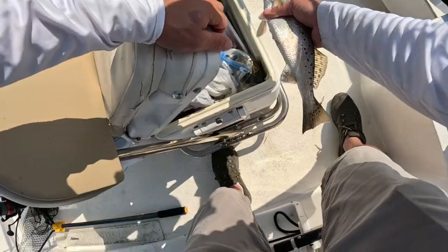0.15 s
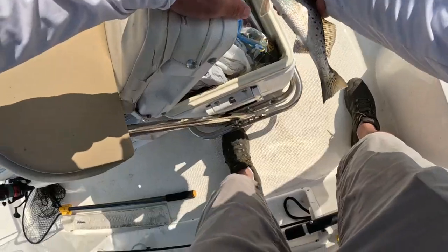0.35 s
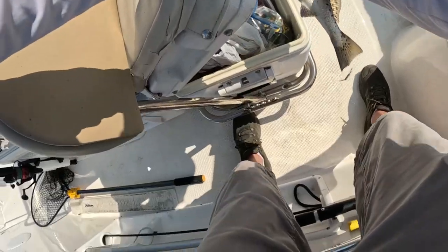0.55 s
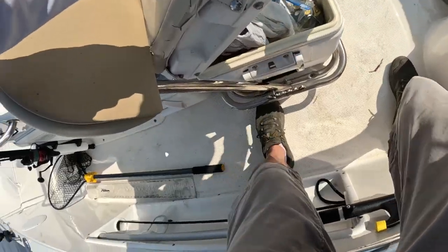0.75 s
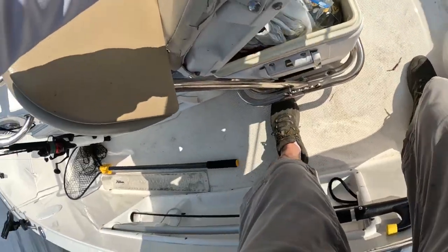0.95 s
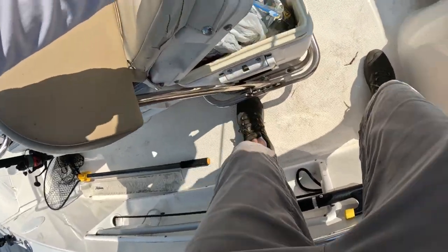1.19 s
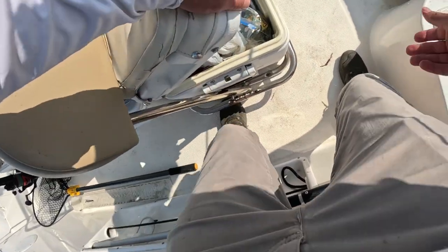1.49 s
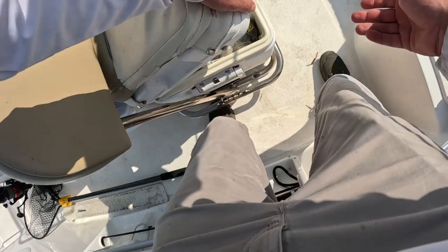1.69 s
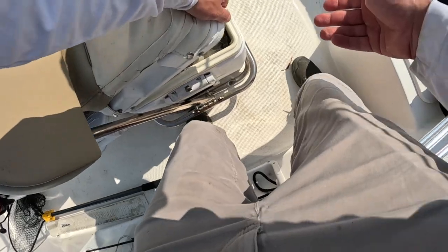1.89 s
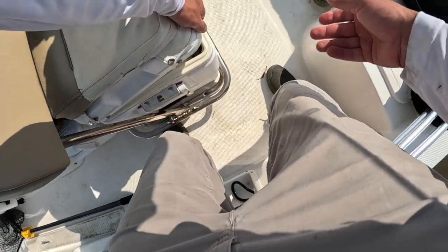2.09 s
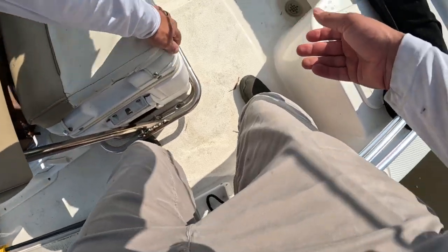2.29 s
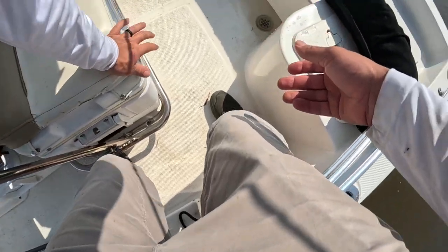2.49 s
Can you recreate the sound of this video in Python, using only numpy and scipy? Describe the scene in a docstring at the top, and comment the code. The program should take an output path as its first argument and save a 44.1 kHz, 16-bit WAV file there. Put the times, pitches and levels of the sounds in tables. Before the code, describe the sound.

Fish flopping in a plastic box, close up: rapid hollow thumps, wet slaps, knocks and rustling

```python
"""A freshly caught fish thrashes in a plastic cooler on a small boat's deck, close to the microphone. Its body
thumps the hollow box: swelling sine pushes, each with a boom of low noise; sines ring and knock. Its wet tail
slaps: short noise cracks with a ping; one faint bright click is made the same way, over a low thud made like a
body blow. Ice and plastic bags crunch and rustle under it: clumped grains and pitched ticks. Low-passed noise
is its body rubbing along the box."""
import sys
import numpy as np
from scipy import signal
from scipy.fft import rfft, irfft
from scipy.io import wavfile
from scipy.ndimage import uniform_filter1d

SR = 44100
rng = np.random.default_rng(int(sys.argv[2]) if len(sys.argv) > 2 else 0)


def pcm_store(signal):
    """Save signal as 16-bit PCM."""
    levels = np.round(np.clip(np.atleast_2d(signal), -1, 1) * 32767)
    wavfile.write(sys.argv[1], SR, levels.astype(np.int16).T)


N = 116865  # samples

# Rubbing of the body along the box. Each row: time in seconds, level in dB.
DRAG_LEVEL = [(0, -41.5), (.15, -34), (0.442, -45), (.78, -43), (.85, -59), (1.02, -51.5), (1.069, -30),
              (1.48, -38.5), (1.93, -32.5), (2.292, -40), (2.41, -30), (2.56, -49)]
# Spectrum of the rubbing. Each row: frequency in Hz, relative gain in dB.
DRAG_SPECTRUM = [(50, -30.5), (100, 2), (330, 6), (450, 1.5), (650, -16.5), (10000, -100)]

# Rustle of ice and bags. Each row: time in seconds, level in dB.
RUSTLE_LEVEL = [(0, -43), (.23, -37.5), (.27, -44.5), (.32, -37), (.39, -41.5), (.42, -56.5), (.50, -34.5),
                (.66, -37), (.71, -50.5), (1.069, -55), (1.078, -34.5), (1.135, -23), (1.20, -40.5),
                (1.28, -30.5), (1.33, -46.5), (1.55, -40), (1.73, -38), (1.86, -47), (1.93, -36.5),
                (2.00, -34.5), (2.10, -47.5), (2.30, -47), (2.39, -34), (2.46, -48), (2.65, -51)]
# Spectrum of the rustle grains. Each row: frequency in Hz, relative gain in dB.
RUSTLE_SPECTRUM = [(200, 9.5), (500, 13.5), (1000, 5.5), (2000, 5.5), (4000, 4.5), (7400, -5.5),
                   (8600, -18.5), (11500, -19), (15500, -42)]
GRAINS_PER_S, GRAIN_SPREAD_DB = 5000, 2.5
CLUMP_DB, CLUMP_S = 5, 0.0065  # limit of the level swing either way, time between its random points
TICKS_PER_S, TICK_DB, TICK_DECAY_CYCLES = 170, 2.5, 8.2
TICK_LOW_HZ, TICK_HIGH_HZ = 1086, 4500

# Hard knocks on a small patch of plastic or ice. Each row: start in seconds, relative level in dB, pitch in Hz.
KNOCKS = [(0.338, -14, 1824), (.338, -26, 642), (.575, -26.5, 1110), (.589, -25, 1600),
          (0.614, -26.5, 1294), (0.635, -8.5, 3310), (0.639, -17, 2020), (0.683, -25, 1430),
          (1.159, -17, 1040), (1.307, -25, 755), (2.034, -20, 2510), (2.376, -17.5, 615)]
KNOCK_RISE_CYCLES, KNOCK_T60_CYCLES = 2.1, 33.5  # higher knocks die sooner

# Blows that leave the box wall ringing. Each row: start in seconds, relative level in dB, pitch in Hz.
WALL_RINGS = [(.211, -22, 513), (0.696, -15.5, 397), (.901, -33.5, 496), (1.172, -15.5, 406),
              (1.35, -11, 173), (1.67, -13.5, 319.4), (2.108, -15.5, 329)]
WALL_RISE_S, WALL_T60_S = 0.004, 0.11

# Wet slaps and, at 0.155 s, a faint bright click. Each row: onset in seconds, relative level in dB,
# ring pitch in Hz, decay in seconds.
SLAPS_AND_CLICK = [(.006, -31, 1412, 0.032), (0.155, -40, 8330, 0.0023), (.209, -22.5, 1055, 0.0053),
                   (.300, -30.5, 5350, 0.0053), (0.333, -22, 7040, 0.0041), (0.338, -18.5, 2540, 0.0025),
                   (.357, -29.5, 2090, 0.012), (0.5745, -23.5, 3440, 0.0045), (0.6355, -21.5, 2390, 0.0062),
                   (.685, -28, 1860, 0.0044), (0.899, -36, 1650, 0.0064), (.954, -35, 3270, 0.0022),
                   (1.088, -22, 710, 0.0079), (1.116, -20, 2460, 0.0047), (1.131, -27, 4200, 0.0022),
                   (1.158, -16.5, 1830, 0.0035), (1.21, -24, 2680, 0.009), (1.267, -17, 1065, 0.0059),
                   (1.346, -22.5, 3666, .012), (1.412, -22.5, 2160, 0.0046), (1.429, -10.5, 3547, 0.0064),
                   (1.508, -26.5, 1383, 0.014), (1.523, -18, 2237, 0.0094), (1.558, -27.5, 2170, 0.0055),
                   (1.600, -27, 1285, 0.0057), (1.661, -25.5, 2040, 0.0024), (1.705, -24, 3140, 0.01),
                   (1.736, -15, 2244, 0.0063), (1.806, -14.5, 2886, 0.0091), (1.886, -16, 3270, 0.0081),
                   (1.900, -20.5, 2067, 0.0092), (2.031, -26, 2070, 0.0084), (2.066, -30, 2560, 0.015),
                   (2.085, -29.5, 5270, 0.0055), (2.154, -34, 2460, 0.011), (2.189, -27.5, 2870, 0.0059),
                   (2.205, -32.5, 1760, 0.0075), (2.252, -32, 1825, 0.012), (2.321, -32.5, 2090, 0.0077),
                   (2.376, -33, 1530, 0.0051), (2.478, -20, 2590, 0.0082), (2.598, -39.5, 930, 0.022)]
# Slap spectrum before tilt and resonance. Each row: frequency in Hz, relative gain in dB.
SLAP_SPECTRUM = [(250, -9.5), (600, 4.5), (1000, -1), (2300, 0.5), (5500, -4.5), (7400, -12.5),
                 (8600, -23.5), (13000, -31), (15500, -64)]
SLAP_RISE_S = 0.001
SPRAY_DB, SPRAY_DECAY_S = -35.5, 0.012  # wet scatter after the smack
TOUCH_DB, TOUCH_S = -11.5, 0.0025  # wet skin touches ahead of the smack
RAGGED_DB, RAGGED_S = 1, 0.00255  # uneven contact
TILT_DB_PER_OCT2 = 5  # dB per octave, for each octave of ring pitch above 2500 Hz
POCKET_NOISE_DB, POCKET_WIDTH_OCT, POCKET_PING_DB = 5.5, 0.2, -11  # trapped air

# Body blows on the box, and at 0.156 s a low thud under the faint bright click. Each row: start in seconds,
# relative level in dB, pitch in Hz at the crest, # time to the crest in seconds.
THUMPS = [(0.156, -22, 365, 0.0057), (0.210, -15.5, 316, 0.0069), (0.256, -24.5, 300, 0.0036),
          (0.339, -6, 399, 0.0049), (0.359, -7.5, 345, 0.0048), (0.522, -16.5, 330, 0.0048),
          (0.537, -11.5, 327, 0.0033), (0.576, -8.5, 384, 0.0099), (0.591, -8, 284, 0.0097),
          (0.609, -11, 348, 0.009), (0.638, -5.5, 237, 0.005), (0.686, -17.5, 254, 0.0074),
          (.901, -22.5, 281, 0.0054), (1.089, -17, 416, 0.0075), (1.113, -7, 254, 0.0023),
          (1.16, -5, 278, 0.0051), (1.267, -6, 340, 0.0079), (1.282, -10.5, 366, 0.009),
          (1.297, -14, 289, 0.0045), (1.314, -14, 370, 0.0059), (1.346, -6, 247, 0.0035),
          (1.413, -8, 280, 0.0038), (1.431, -8, 294, 0.0042), (1.528, -12, 289, 0.0046),
          (1.558, -14, 256, 0.0035), (1.602, -16, 290, 0.0048), (1.662, -7, 325, 0.0069),
          (1.742, -3.5, 282, 0.0049), (1.758, -15, 363, 0.0032), (1.811, -7.5, 384, 0.002),
          (1.824, -14, 315, 0.0069), (1.886, -17, 378, 0.004), (1.903, -12, 217, 0.003),
          (2.03, -10.5, 397.3, 0.011), (2.087, -9, 339, 0.0096), (2.154, -17, 400, 0.0021),
          (2.192, -10, 340, 0.0028), (2.208, -17.5, 341, 0.015), (2.323, -17.5, 342, 0.0061),
          (2.378, -12, 395, 0.003), (2.538, -30, 385, 0.0075)]
SWELL_POWER, SAG = 3.6, 0.099  # steepness of the blow, share by which pitch sinks per swell time
# Boom spectrum of the box for a 320 Hz blow. Each row: frequency in Hz, relative gain in dB.
BOX_SPECTRUM = [(60, -39.5), (110, -13), (165, 0), (300, 2), (420, 6.5), (520, -12.5), (680, -14),
                (10000, -110)]
BOX_DB, BOX_T60_S, BOX_RISE_S = -5, 0.11, 0.0031
BOOM_FOLLOW = 0.27  # exponent by which the boom follows the blow's pitch

SHADE_FROM_S, SHADE_DB_PER_S, SHADE_HZ = 1.56, -11, 5800
LOW_CUT_HZ, TOP_CUT_HZ, EDGE_HZ = 116, 13200, 15700
CEILING = 0.77  # full scale = 1


def amp(db):
    """Converts dB to an amplitude factor."""
    return 10 ** (np.asarray(db) / 20)


def unit(x):
    """Scales to rms 1."""
    return x / np.sqrt(np.mean(x ** 2) + 1e-20)


def read(points, hz):
    """Reads a spectrum in dB on a log-frequency axis."""
    f, db = np.transpose(points)
    return np.interp(np.log(hz + 1), np.log(f), db)


def colour(x, gain_db):
    """Filters x by a function from Hz to dB; rms 1."""
    hz = np.fft.rfftfreq(len(x), 1 / SR)
    return unit(irfft(rfft(x) * amp(gain_db(hz)), len(x)))


def steady_noise(gain_db, size):
    """Coloured noise with its slow level swings evened out."""
    x = colour(rng.standard_normal(size), gain_db)
    power = uniform_filter1d(x ** 2, size=400, mode="wrap")
    return x / np.sqrt(power + 1e-9)


def add(mix, start_s, sound):
    """Adds a sound into the mix in place, cut at the end."""
    part = mix[max(round(start_s * SR), 0):][:len(sound)]
    part += sound[:len(part)]


def drag():
    """The body rubs along the box, which answers with a low hollow rumble."""
    level_db = np.interp(np.arange(N) / SR, *np.transpose(DRAG_LEVEL))
    return amp(level_db) * steady_noise(lambda f: read(DRAG_SPECTRUM, f), size=N)


def crackle():
    """Tiny clicks of random sign and strength, louder and softer in clumps, as ice and bags give way."""
    hits = rng.random(N) < GRAINS_PER_S / SR
    signs = rng.choice([-1., 1.], N)
    grains = hits * signs * amp(GRAIN_SPREAD_DB * np.minimum(rng.exponential(1, N), 4))
    swing = np.interp(np.arange(N) / SR / CLUMP_S, np.arange(N), rng.standard_normal(N))
    return colour(grains * amp(CLUMP_DB * np.tanh(swing)), lambda f: read(RUSTLE_SPECTRUM, f))


def wet_tick(pitch, strength):
    """A small damped resonance; pitch from 0 to 1 spans the tick range in octaves."""
    hz = TICK_LOW_HZ * (TICK_HIGH_HZ / TICK_LOW_HZ) ** pitch
    cycles = hz * np.arange(2048) / SR
    envelope = (1 - np.exp(-cycles)) * np.exp(-cycles / TICK_DECAY_CYCLES)
    return 2 * strength ** 2 * amp(TICK_DB) * envelope * np.sin(2 * np.pi * cycles)


def rustle():
    """Crackles and pitched wet ticks as the fish slides over ice and bags."""
    sound = crackle()
    draws = rng.random((int(TICKS_PER_S * N / SR), 3))
    for k, (when, pitch, strength) in enumerate(draws):
        add(sound, (k + when) / TICKS_PER_S, wet_tick(pitch, strength))
    level_db = np.interp(np.arange(N) / SR, *np.transpose(RUSTLE_LEVEL))
    return amp(level_db) * sound


def ring(level_db, hz, rise_s, t60_s):
    """One mode swells and dies away freely."""
    t = np.arange(8192) / SR
    envelope = amp(level_db - 60 * t / t60_s) * (1 - np.exp(-t / rise_s))
    return 2 * envelope * np.sin(2 * np.pi * hz * t)


def knock(level_db, hz):
    """A small hard patch rings for a set number of cycles."""
    return ring(level_db, hz, KNOCK_RISE_CYCLES / hz, KNOCK_T60_CYCLES / hz)


def wall_ring(level_db, hz):
    """The box wall rings freely after a blow."""
    return ring(level_db, hz, WALL_RISE_S, WALL_T60_S)


def slap_or_click(level_db, ring_hz, decay_s):
    """A slap: wet skin touches, smacks plastic, traps air that pings, scatters. The same shape, made short and
    high, also gives the faint bright click."""
    t = np.arange(6000) / SR - np.pi * TOUCH_S  # smack starts at 0
    slope_db_per_oct = TILT_DB_PER_OCT2 * np.log2(ring_hz / 2500)

    def gain_db(f):
        octaves = np.log2((f + 1) / ring_hz)
        tilt = slope_db_per_oct * np.log2(np.clip(f, 1000, 11000) / 2500)
        pocket = POCKET_NOISE_DB * np.exp(-.5 * (octaves / POCKET_WIDTH_OCT) ** 2)
        return read(SLAP_SPECTRUM, f) + tilt + pocket

    after = np.maximum(t - SLAP_RISE_S, 0)
    decay = np.exp(-after / decay_s) + amp(SPRAY_DB) * np.exp(-after / SPRAY_DECAY_S)
    smack = np.clip(t / SLAP_RISE_S, 0, 1) * decay
    touch = amp(TOUCH_DB) * np.exp(-abs(t) / TOUCH_S)
    ragged = np.interp((t - t[0]) / RAGGED_S, np.arange(len(t)), rng.uniform(-1.1, 1, len(t)))
    envelope = amp(RAGGED_DB * ragged) * np.hypot(smack, touch)
    crack = envelope * steady_noise(gain_db, size=len(t))
    ping = amp(POCKET_PING_DB) * smack * np.sqrt(2) * np.sin(2 * np.pi * ring_hz * t)
    return amp(level_db) * (crack + ping)


def thump(level_db, hz, swell_s):
    """The soft body pushes the wall a few deep cycles; the hollow box booms on, deeper for deeper blows."""
    t = np.arange(8192) / SR
    u = t / swell_s  # crest at 1
    pitch_hz = hz * (1 + SAG * (1 - np.minimum(u, 2)))  # sinks as the body settles
    swell = (u * np.exp(1 - u)) ** SWELL_POWER
    push = swell * np.sqrt(2) * np.sin(2 * np.pi * np.cumsum(pitch_hz) / SR)
    shift = (hz / 320) ** BOOM_FOLLOW
    noise = steady_noise(lambda f: read(BOX_SPECTRUM, f / shift), size=len(t))
    boom = noise * (1 - np.exp(-t / BOX_RISE_S)) * amp(BOX_DB - 60 * t / BOX_T60_S)
    return amp(level_db) * (push + boom)


def shaded(x):
    """The top of the treble fades towards the end."""
    hz = np.fft.rfftfreq(N, 1 / SR)
    top = irfft(rfft(x) * (1 - 1 / (1 + (hz / SHADE_HZ) ** 8)), N)
    fade_db = SHADE_DB_PER_S * np.maximum(np.arange(N) / SR - SHADE_FROM_S, 0)
    return x - top * (1 - amp(fade_db))


def scene():
    """All sounds at one close microphone."""
    mix = drag() + rustle()
    for start_s, *row in KNOCKS:
        add(mix, start_s, knock(*row))
    for start_s, *row in WALL_RINGS:
        add(mix, start_s, wall_ring(*row))
    for onset_s, *row in SLAPS_AND_CLICK:
        add(mix, onset_s - np.pi * TOUCH_S, slap_or_click(*row))
    for start_s, *row in THUMPS:
        add(mix, start_s, thump(*row))
    return shaded(mix)[None]


def record(dry):
    """Deep bass and top treble roll off; peaks are rounded; then a steep band limit."""
    x = signal.sosfilt(signal.butter(2, LOW_CUT_HZ, "highpass", fs=SR, output="sos"), dry)
    x = signal.sosfilt(signal.butter(2, TOP_CUT_HZ, fs=SR, output="sos"), x)
    x = x / (1 + (x / CEILING) ** 6) ** (1 / 6)
    band_limit = signal.firwin(511, EDGE_HZ, window=("kaiser", 9), fs=SR)
    return signal.oaconvolve(x, band_limit[None], "same")


dry = scene()
out = record(dry)
pcm_store(out)
```